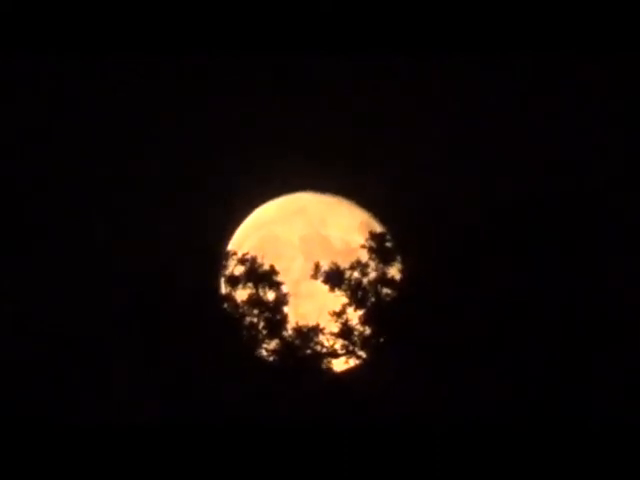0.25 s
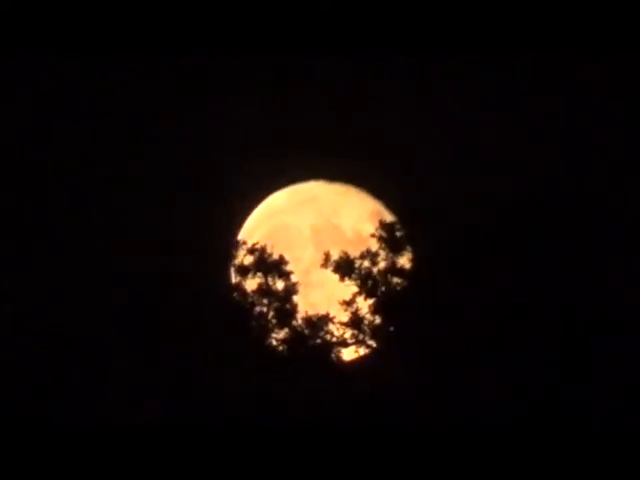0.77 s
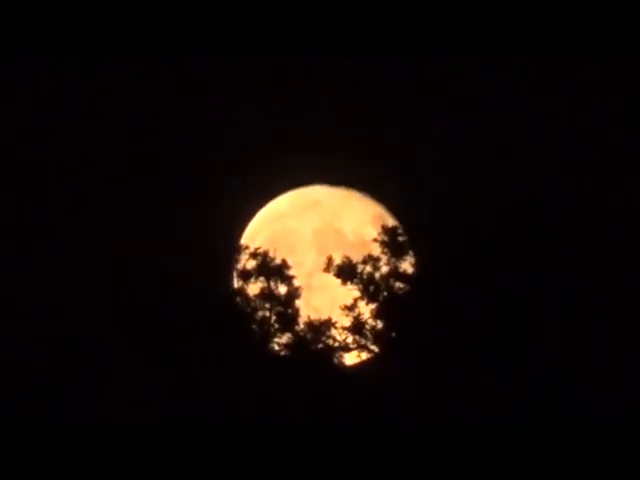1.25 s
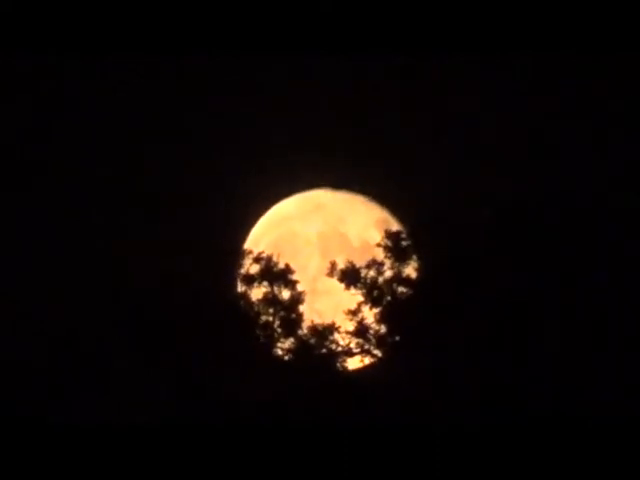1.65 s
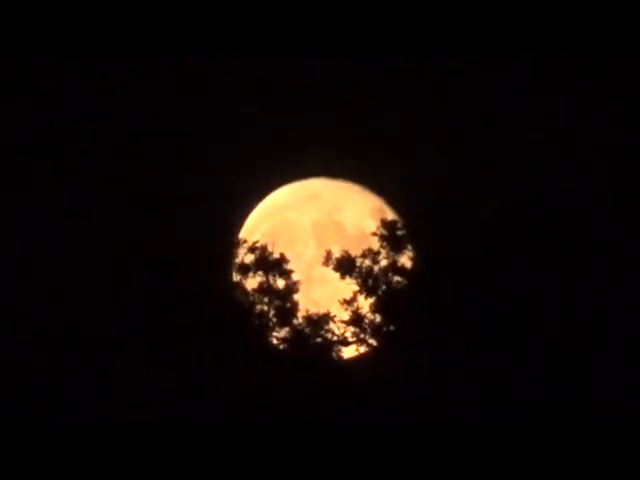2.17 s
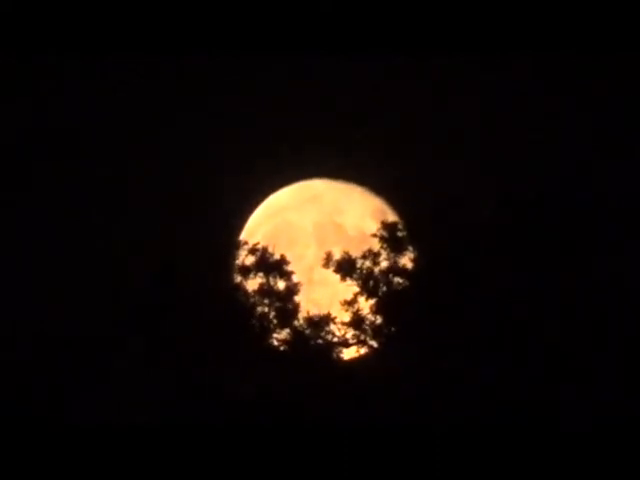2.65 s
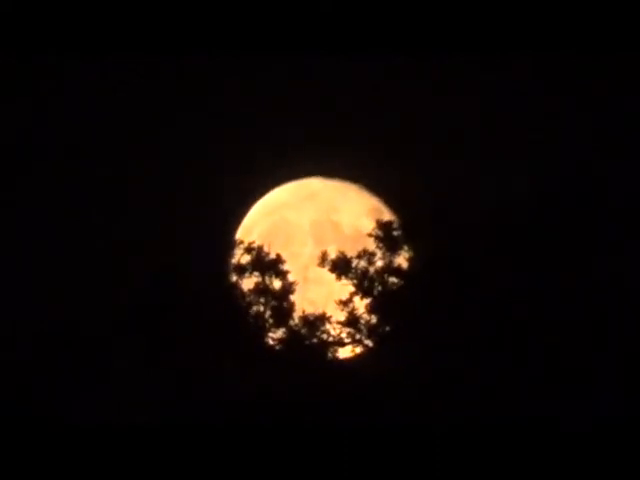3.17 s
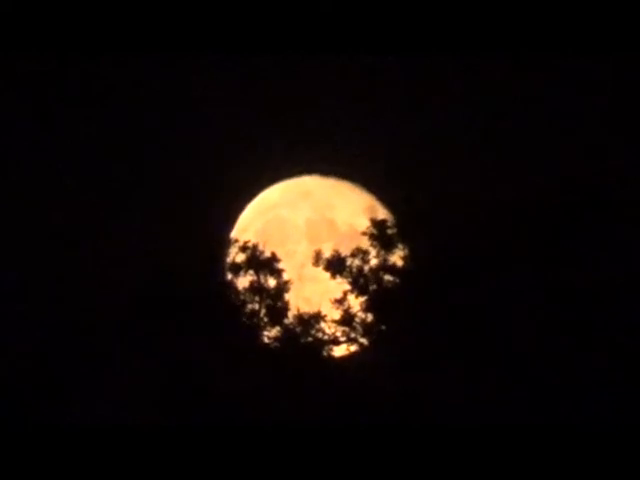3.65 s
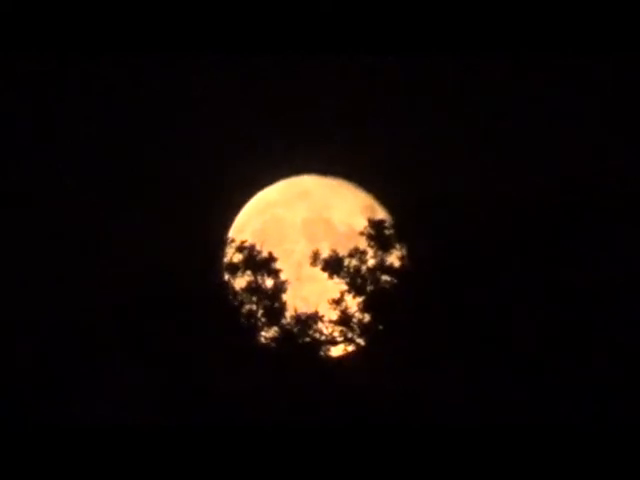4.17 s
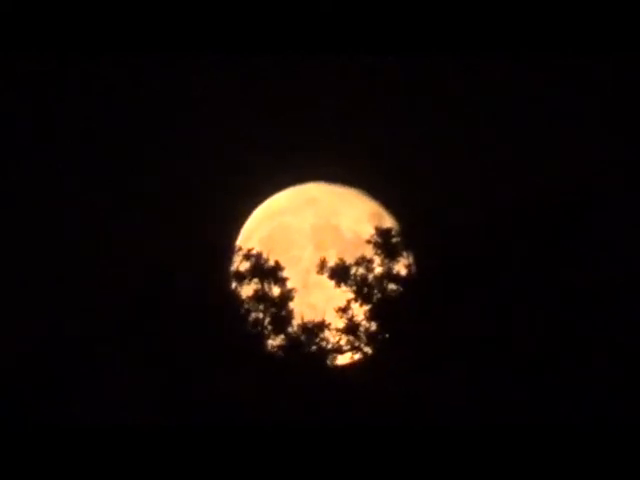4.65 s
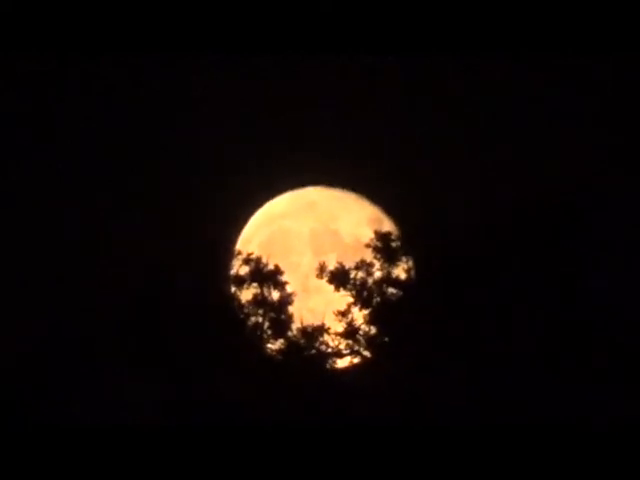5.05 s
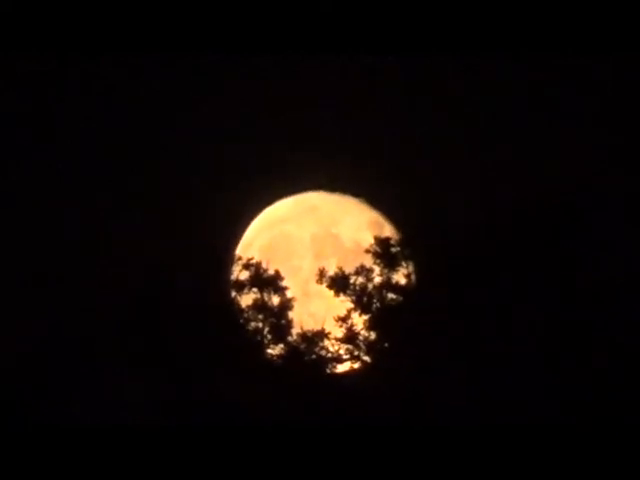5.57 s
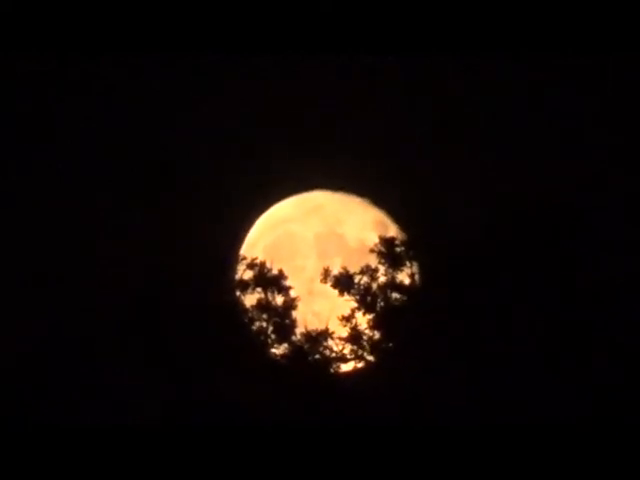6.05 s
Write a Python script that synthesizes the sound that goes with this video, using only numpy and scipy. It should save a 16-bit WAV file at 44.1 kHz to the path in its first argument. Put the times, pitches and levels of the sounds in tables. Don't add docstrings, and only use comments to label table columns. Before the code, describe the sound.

In a dark garden under a full moon, three groups of tree crickets trill in overlapping bursts, one louder and central, a higher one to the left. Above them katydids rasp as a faint, ragged, very high hiss. Soft distant traffic lies beneath. A small dry twig snap clicks just past halfway, with two barely audible ticks elsewhere. A small camera microphone dulls the very top, and leaves add a light echo.

```python
import sys
import numpy as np
from scipy import signal
from scipy.fft import rfft, irfft, next_fast_len
from scipy.io import wavfile
from scipy.ndimage import uniform_filter1d, map_coordinates

SR = 44100
rng = np.random.default_rng(int(sys.argv[2]) if len(sys.argv) > 2 else 0)


def transcribe(u):
    v = np.clip(np.atleast_2d(u).T, -1, 1)
    q = np.round(v * 32767).astype(np.int16)
    wavfile.write(sys.argv[1], SR, q)


def field_ratio(decibels):
    return 10 ** (np.asarray(decibels, dtype=float) / 20)


N = 278271
TIME = np.arange(N) / SR

# strokes_per_s, start_hz, fall_hz, sounding_share (of each stroke), gain_db, lean_left_db
CRICKET_GROUPS = [
    (52, 3400, 405, 0.776, -1, 2),
    (56.87, 3630, 328, 0.836, 1.18, -.4),
    (62, 3760, 329, 0.73, 0.5, 8.5),
]
# start_s, length_s, tone_db
LOW_TRILLS = [(.24, 0.37, -45.5), (.24, .76, -48.5), (1.093, 1.07, -47.5), (1.32, 0.73, -46.5),
              (2.12, 1.37, -49.5), (2.45, 0.39, -49), (3.74, 0.61, -45), (3.95, 0.2, -42),
              (4.848, 0.51, -46.5), (4.997, 0.13, -45), (5.95, .5, -44.5), (6.197, .2, -43.5)]
# start_s, length_s, tone_db, octave_db
MIDDLE_TRILLS = [(-.1, 0.72, -41, -61), (0.382, 0.12, -40, -63), (0.604, 0.35, -38, -58),
                 (0.737, .28, -39, -65), (1.075, 0.7, -38.5, -60.5), (1.604, 0.43, -38.5, -62),
                 (2.07, 0.55, -45, -62.5), (2.112, 0.19, -40.5, -65.5), (2.578, 0.52, -38.5, -67),
                 (2.6, .73, -40.5, -59.5), (3.357, 0.38, -44.5, -70.5), (3.726, 0.41, -35, -58),
                 (4.163, 0.26, -41.5, -61.5), (4.562, 1.5, -43.5, -69), (4.66, 1.18, -44, -69),
                 (4.798, 0.47, -39, -60), (4.998, 0.33, -51, -60), (5.767, 0.63, -39, -59.5),
                 (5.915, 0.2, -37.5, -63), (6.22, .2, -39, -60)]
# start_s, length_s, tone_db
HIGH_TRILLS = [(-.1, .5, -41), (.5, 0.089, -44.5), (.98, .64, -44.5), (1.66, .36, -46.5), (2.1, 0.52, -45),
               (2.62, 0.24, -46), (2.85, 0.46, -43), (3.33, 0.23, -49.5), (3.9, 0.3, -42.5),
               (3.9, 0.49, -45.5), (4.62, .33, -45), (4.95, .42, -44), (5.4, .5, -50), (5.95, .4, -42)]
BETWEEN_TRILLS_DB = [
    -48.5,
    -46,
    -53,
    -74,
]
# frequency_hz, level_db (per Hz)
WING_SCRAPE = [(2400, -20), (2900, -0.5), (4200, -1.5), (5000, -8.5), (6400, -17.5), (8000, -8),
               (11000, -28)]
ATTACK_S, RELEASE_S, SWELL_DB = 0.028, 0.068, -0.1
OCTAVE_DB, OCTAVE_LEAN = [-1, -0.5, 2], 0.33

# frequency_hz, level_db (per Hz)
NEAR_RASP = [(7500, -31), (8300, -20), (9000, -7), (9500, -3), (9800, -1), (10150, 1), (10600, -1.5),
             (11000, -4.5)]
# frequency_hz, level_db (per Hz)
FAR_RASP_COLOUR = [(7000, -34), (7900, -12), (8600, 2.5), (9500, 5.5), (10500, -1), (11300, -23)]
PHRASE_DB = [
    0,
    -9,
    -13,
]
# time_s, level_db
FAR_CHOIR_LEVEL = [(0, -70), (.3, -60), (1.9, -59), (2.3, -65), (2.6, -56), (3.4, -67), (4.25, -55),
                   (4.6, -65), (5.9, -66), (6.31, -58)]
# time_s, level_db
FAR_ZIPS = [(.19, -56), (1.74, -63), (1.87, -58), (2.43, -53), (2.63, -56), (4.18, -51.5), (4.38, -56),
            (6.17, -53)]
NEAR_RASP_DB, ZIP_S = -52.5, 0.013

# frequency_hz, level_db (per Hz)
NIGHT_COLOUR = [(20, -46), (35, -34), (60, -28), (100, -11), (200, -6), (600, 0.5), (1500, -4), (2700, -3),
                (4200, -5.5), (5800, -8), (8000, -4.5), (11200, -7)]
# frequency_hz, likeness (0 to 1)
NIGHT_LIKENESS = [(60, 0.74), (130, 1), (270, 0.64), (570, 0.3), (1200, 0.19), (2400, 0.26), (5400, 0.64),
                  (11000, 0.52)]
# time_s, pitch_hz, length_s, level_db
FAR_CALLS = [
    (0.131, 702, 0.036, -58),
    (5.283, 784, .05, -59),
]
TRAFFIC_DB, RECEDES_DB_PER_S = -60.5, 0.29

# time_s, peak_db, knock_db, lean_left_db
TWIG_SNAPS = [
    (2.7056, -59, -18, 0.5),
    (3.219, -41, -4, -4.5),
    (5.6031, -61, -11, -2.0),
]
# delay_s, crack_db, knock_db
FIBRES = [
    (.0007, 0, -3),
    (.0014, -3, -20),
    (.0036, -12, -7),
    (.0066, -18, -15),
]
# pitch_hz, width_hz, level_db
WOOD_RING = [(660, 110, 3.5), (945, 220, 3), (1360, 420, 2), (1750, 310, -2), (2180, 190, 0),
             (2600, 250, -2)]
# pitch_hz, width_hz, level_db
CRACK_RING = [(4150, 500, 3), (5700, 450, 5), (6800, 700, 2), (7700, 500, 4), (9200, 900, 2)]
THIN_HZ = 546

# frequency_hz, level_db
MICROPHONE_EDGE = [(10990, 0), (11040, -15), (11300, -23), (11700, -36)]


def unit(x):
    return x / np.sqrt(np.mean(x ** 2) + 1e-20)


def along(points, hz):
    f, v = np.transpose(points)
    return np.interp(np.log(hz + 1), np.log(f + 1), v)


def wobble(rate):
    return map_coordinates(rng.standard_normal(int(N * 40 / SR)), [TIME * rate])


def filtered(x, response):
    m = next_fast_len(N + SR // 2)
    return irfft(rfft(x, m) * response(np.fft.rfftfreq(m, 1 / SR)), m)[..., :N]


def rush(spectrum, alike):
    def colour(hz):
        angle = np.arccos(np.clip(along(alike, hz), -1, 1)) / 2
        return field_ratio(along(spectrum, hz)) * [np.cos(angle), np.sin(angle)]

    mid, side = filtered(rng.standard_normal((2, N)), colour)
    return unit(np.array([mid + side, mid - side]))


def placed(x, lean_db, turn=0):
    ears = np.array([[.5], [-.5]])
    return np.real(x * (field_ratio(ears * lean_db) * np.exp(1j * turn * ears)))


def steady(x):
    return x / np.sqrt(np.abs(uniform_filter1d(np.mean(x ** 2, axis=0), size=SR // 9)))


def patchy(x, db):
    z = signal.stft(x, nperseg=256)[2]
    field = uniform_filter1d(rng.standard_normal(z.shape[1:]), size=2, axis=0)
    field = uniform_filter1d(field, size=20, axis=1)
    return unit(signal.istft(z * field_ratio(db * unit(field)), nperseg=256)[1][:, :N])


def foliage(x, t60, wet_db, count=24):
    t, hop = np.arange(SR // 3) / SR, N // count
    wet = np.zeros((2, 2 * N))
    x = np.pad(x, ((0, 0), (hop, 2 * hop)))
    fade = np.sin(np.linspace(0, np.pi, 2 * hop))
    for start in range(0, N + hop, hop):
        shared, left, right = rng.standard_normal((3, len(t))) * field_ratio(-60 * t / t60) * (t > .004)
        tail = shared + .55 * np.array([left, right])
        piece = x[:, start:start + 2 * hop] * fade
        answer = signal.fftconvolve(piece, tail / np.linalg.norm(tail[0]), axes=1)
        wet[:, start:start + answer.shape[1]] += answer
    return (x[:, :N + hop] + field_ratio(wet_db) * wet[:, :N + hop])[:, hop:]


def trills(rows, between_db, column=2):
    power, t = field_ratio(between_db) ** 2, TIME[::64]
    for row in rows:
        age, length = t - row[0], row[1]
        shape = np.clip(np.minimum(age / ATTACK_S, 1 + (length - age) / RELEASE_S), 0, 1)
        level = field_ratio(row[column] + SWELL_DB * (age / length - .5))
        power = power + (shape * level) ** 2
    return np.interp(TIME, t, 10 * np.log10(power))


def cricket(rate, start_hz, fall_hz, share):
    strokes = np.cumsum(rate * (1 + .008 * wobble(3))) / SR + rng.random()
    part = np.clip(strokes % 1 / np.clip(share, .1, 1), 0, 1)
    slip, size = rng.standard_normal((2, N // 400))[:, strokes.astype(int)]
    cycles = share / rate * (start_hz * part - fall_hz * part ** 2 / 2)
    phase = 2 * np.pi * cycles + 1.305 * slip
    loudness = np.abs(np.sin(np.pi * part ** 0.67)) ** 1.16 * field_ratio(1.12 * size)
    return unit(loudness) * np.exp(1j * phase)


def crickets(count=5):
    group_rows = (LOW_TRILLS, MIDDLE_TRILLS, HIGH_TRILLS)
    levels_db = [trills(rows, db) for rows, db in zip(group_rows, BETWEEN_TRILLS_DB)]
    octave_db = trills(MIDDLE_TRILLS, BETWEEN_TRILLS_DB[-1], column=3)
    tones, octaves = 0, 0
    for settings, level_db, carry_db in zip(CRICKET_GROUPS, levels_db, OCTAVE_DB):
        rate, start_hz, fall_hz, share, db, lean_db = settings
        group, doubled = 0, 0
        for rank in range(count):
            off = rng.standard_normal(4) * (rank > 0)
            tone = cricket(rate * (1 + .035 * off[0]), start_hz * (1 + 0.01 * off[1]), fall_hz, share)
            gain = field_ratio(-1.2 * rank + 0.98 * wobble(1.56))
            group = group + placed(gain * tone, lean_db + .5 * off[2], .2 * off[3])
            octave_lean_db = .5 + OCTAVE_LEAN * lean_db + .7 * off[2]
            doubled = doubled + placed(gain * tone ** 2, octave_lean_db, 0.35 * off[3])
        tones = tones + field_ratio(level_db + db) * steady(group)
        octaves = octaves + field_ratio(level_db + db + carry_db) * doubled
    scrape = field_ratio(octave_db - 1.5) * rush(WING_SCRAPE, [(4000, 0.43)])
    return tones + field_ratio(octave_db - 1.0) * steady(octaves) + scrape


def katydids():
    choir_s, choir_db = np.transpose(FAR_CHOIR_LEVEL)
    far_gain = field_ratio(np.interp(TIME, choir_s, choir_db))
    for s, db in FAR_ZIPS:
        far_gain = far_gain + field_ratio(db) * np.exp(-((TIME - s) / ZIP_S) ** 2)
    strokes = 47.3 * TIME + 0.33 + 0.057 * wobble(1.6)
    stroke_db = np.array(PHRASE_DB)[strokes.astype(int) % len(PHRASE_DB)]
    gate = field_ratio(stroke_db) * np.sin(np.pi * (strokes % 1) ** 0.65) ** 2
    pulses = unit(1.35 + gate * field_ratio(1.8 * wobble(12)))
    near = pulses * patchy(rush(NEAR_RASP, [(9000, 0.9)]), db=1.5)
    far = patchy(rush(FAR_RASP_COLOUR, [(9000, 0.91)]), db=4.5)
    lean = field_ratio([[-.4], [.4]])
    return (field_ratio(NEAR_RASP_DB + 5.5) * near + field_ratio(-1.0) * far_gain * far) * lean


def night():
    waver = 2 * np.pi * np.cumsum(25 * wobble(39)) / SR
    calls = 0
    for s, hz, length, db in FAR_CALLS:
        swell = np.exp(-((TIME - s) / length) ** 2 * 2)
        calls = calls + field_ratio(db) * swell * np.sin(2 * np.pi * hz * TIME + waver)
    level_db = TRAFFIC_DB - RECEDES_DB_PER_S * TIME + 8.5 + 0.9 * wobble(2.74)
    return field_ratio(level_db) * rush(NIGHT_COLOUR, NIGHT_LIKENESS) + calls


def ringing(modes, f):
    total = 0
    for k, (pitch, width, db) in enumerate(modes):
        peak = 1j * f * width / (pitch * pitch - f * f + 1j * f * width)
        total = total + (-1) ** k * field_ratio(db) * peak
    return total


def thin_wood(f):
    radiated = f * f / (f * f - THIN_HZ ** 2 - 1j * f * THIN_HZ)
    return ringing(WOOD_RING, f) * radiated ** 2


def snaps():
    crack, knock = np.zeros((2, N)), np.zeros((2, N))
    for s, db, knock_db, lean_db in TWIG_SNAPS:
        for delay, fibre_db, thud_db in FIBRES:
            at = round((s + delay) * SR)
            crack[:, at] = placed(field_ratio(db + 26 + fibre_db), lean_db)[:, 0]
            knock[:, at] = placed(field_ratio(db + knock_db + 36.0 + thud_db), lean_db)[:, 0]
    return filtered(crack, lambda hz: ringing(CRACK_RING, hz)) + filtered(knock, thin_wood)


def scene():
    among_leaves = foliage(crickets(), t60=0.73, wet_db=-6)
    twig = foliage(snaps(), t60=0.083, wet_db=-13)
    return among_leaves + katydids() + twig + night()


def low_pass(x):
    return signal.sosfilt(signal.butter(12, 11750, fs=SR, output="sos"), x)


def record(dry):
    mix = filtered(dry, lambda hz: field_ratio(along(MICROPHONE_EDGE, hz)))
    return low_pass(mix)


dry = scene()
out = record(dry)
transcribe(out)
```